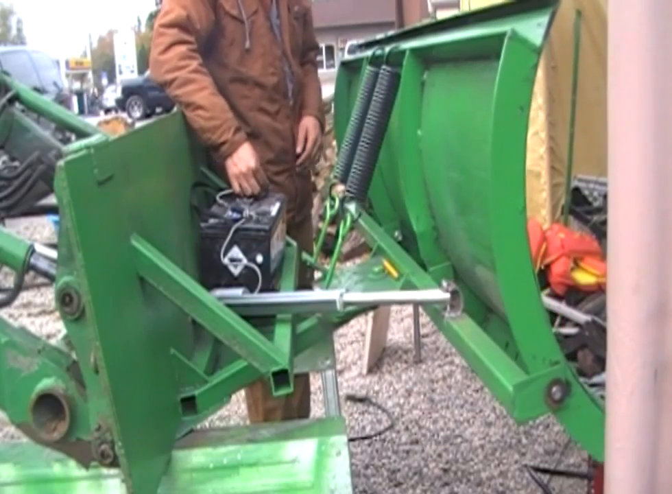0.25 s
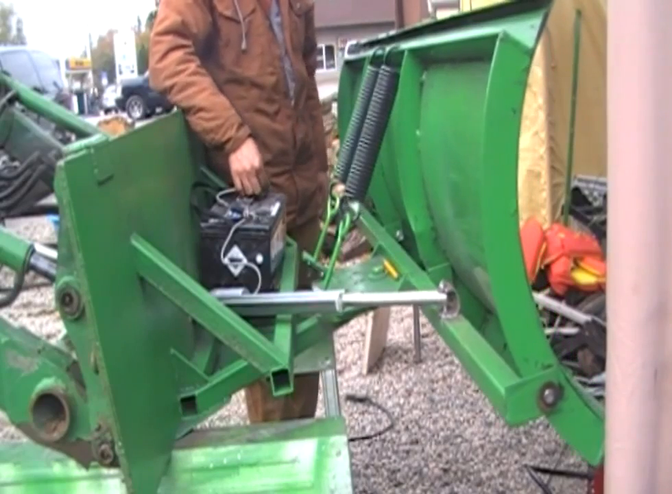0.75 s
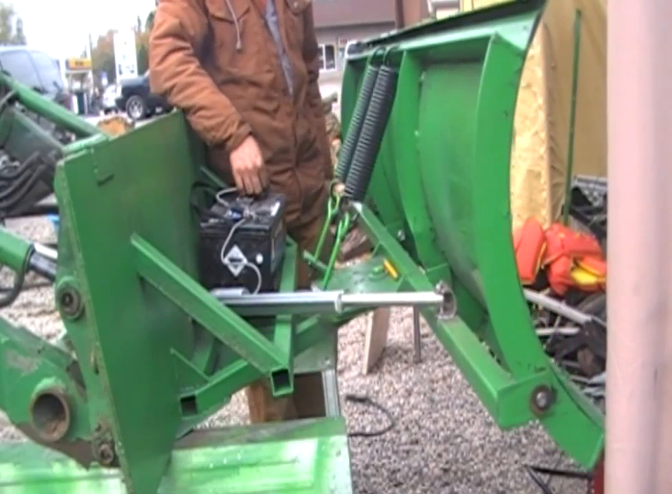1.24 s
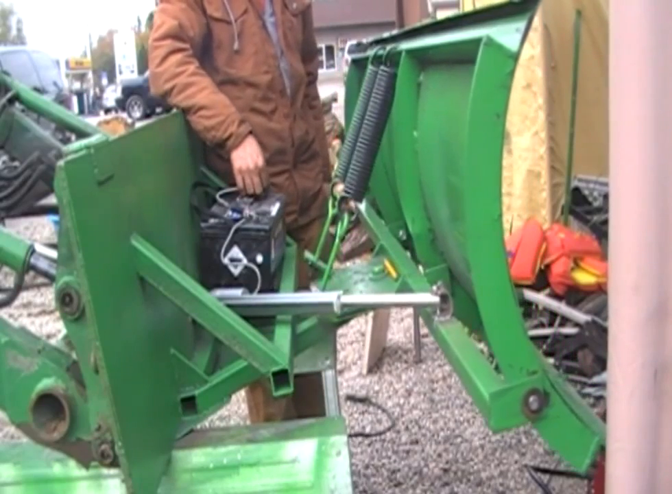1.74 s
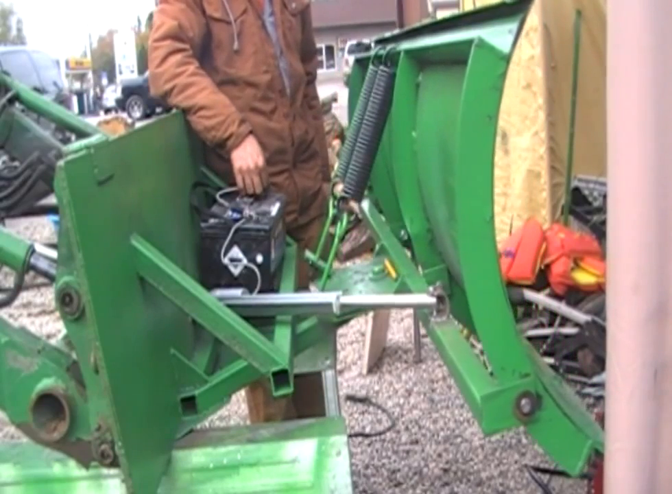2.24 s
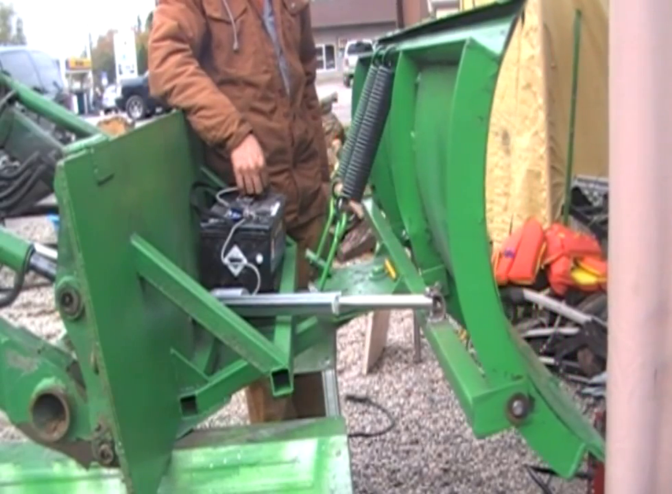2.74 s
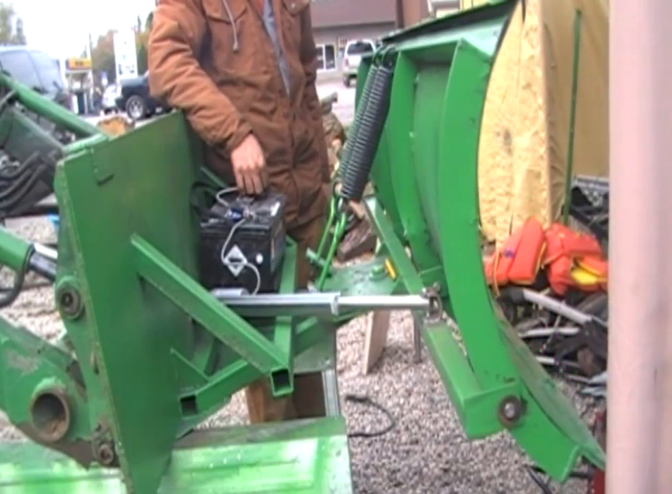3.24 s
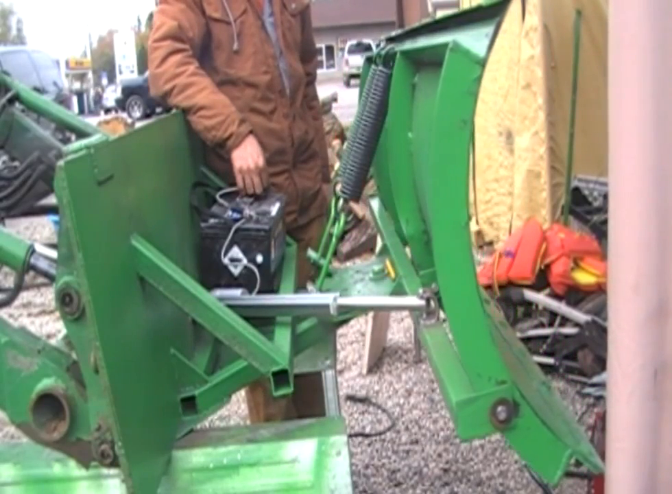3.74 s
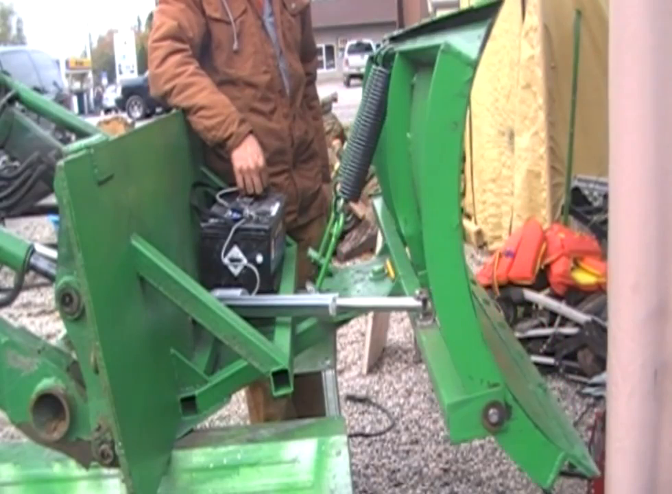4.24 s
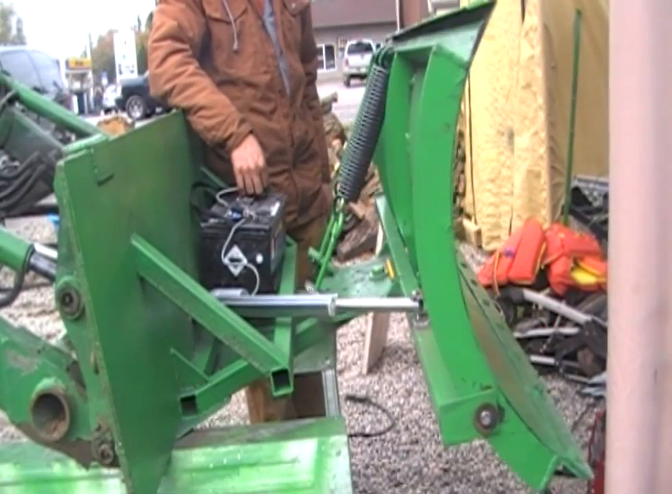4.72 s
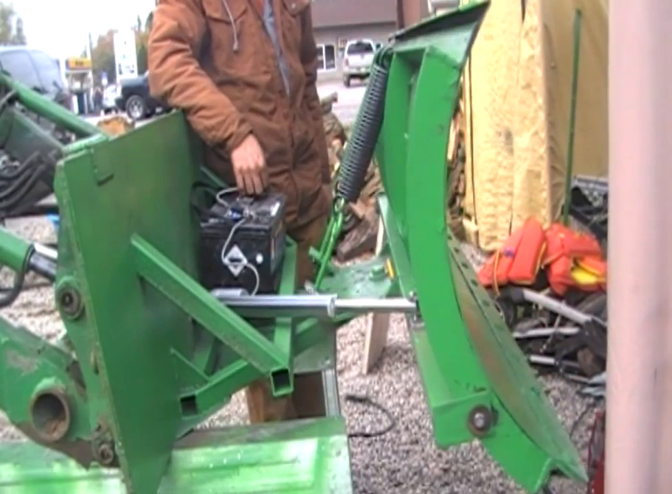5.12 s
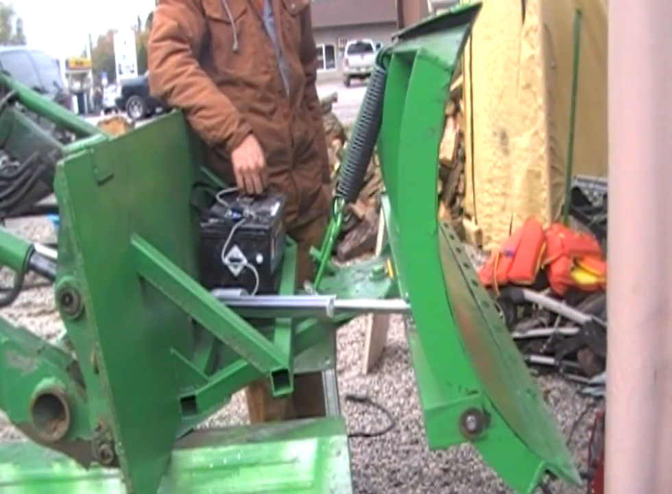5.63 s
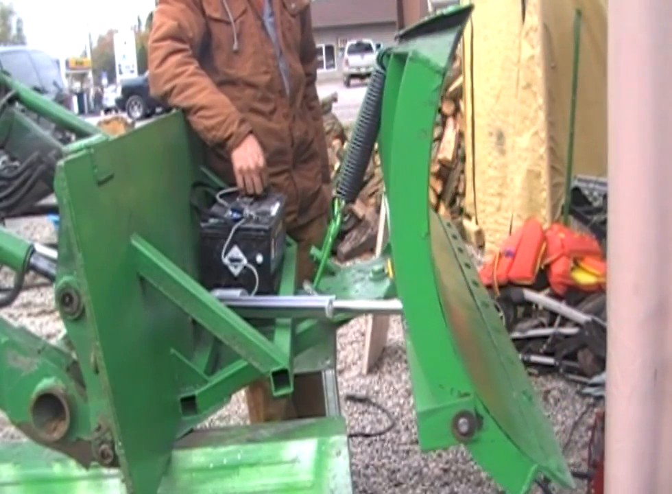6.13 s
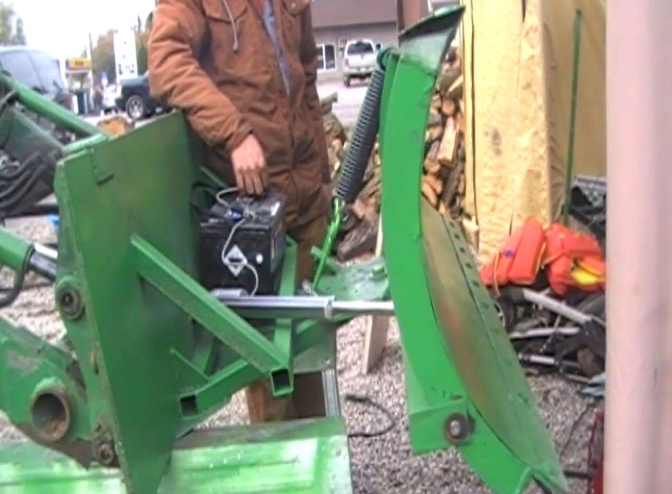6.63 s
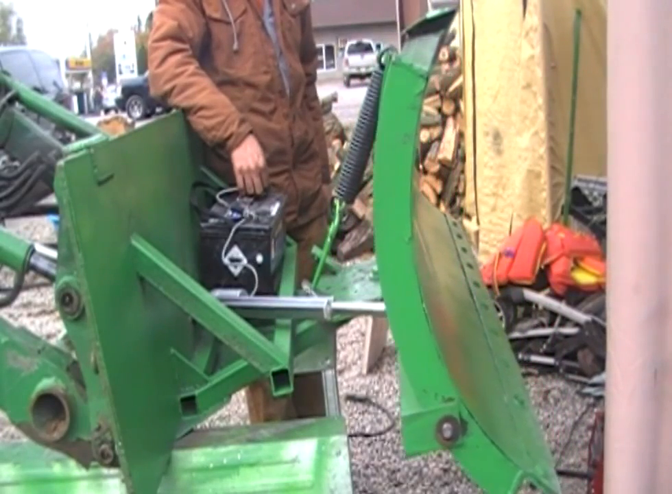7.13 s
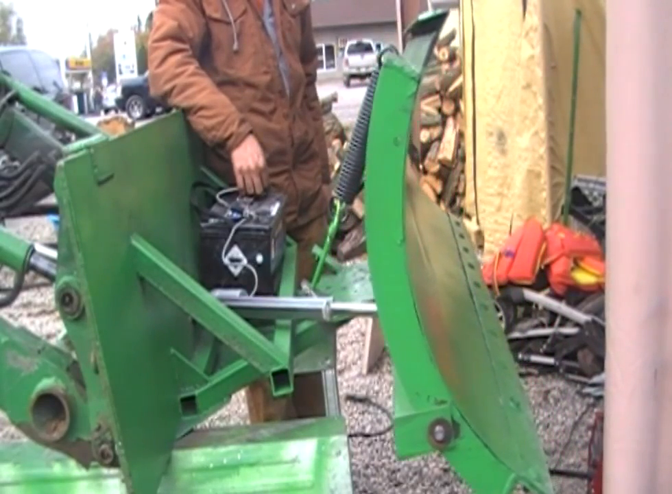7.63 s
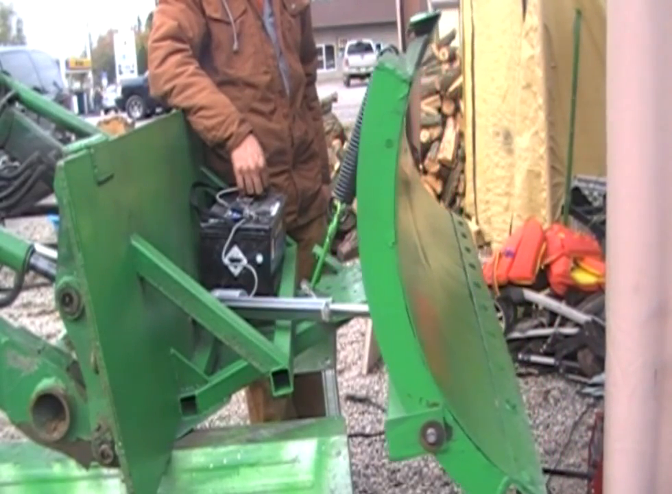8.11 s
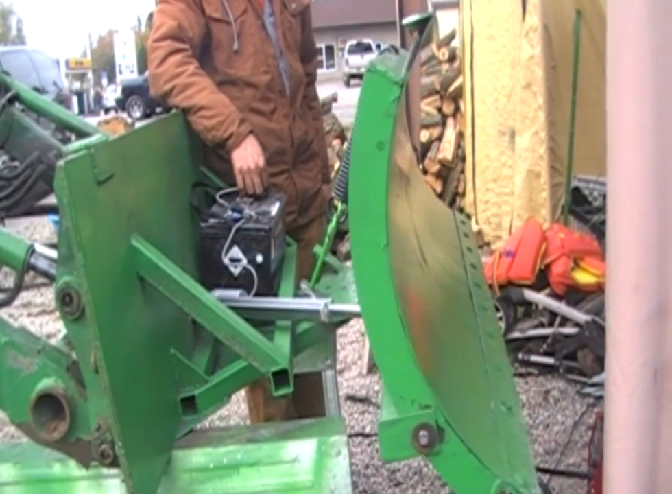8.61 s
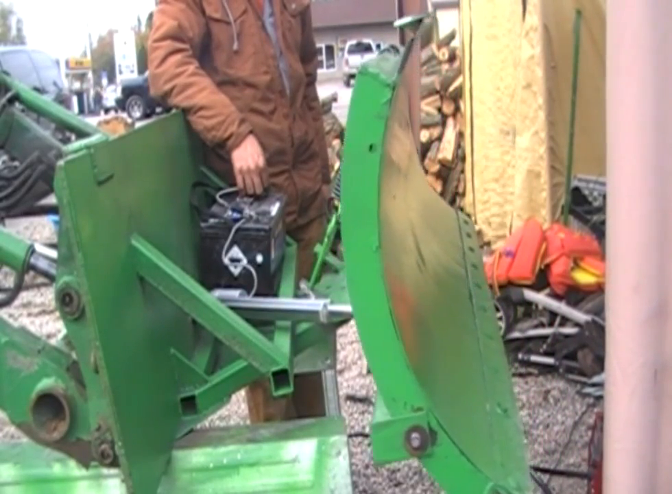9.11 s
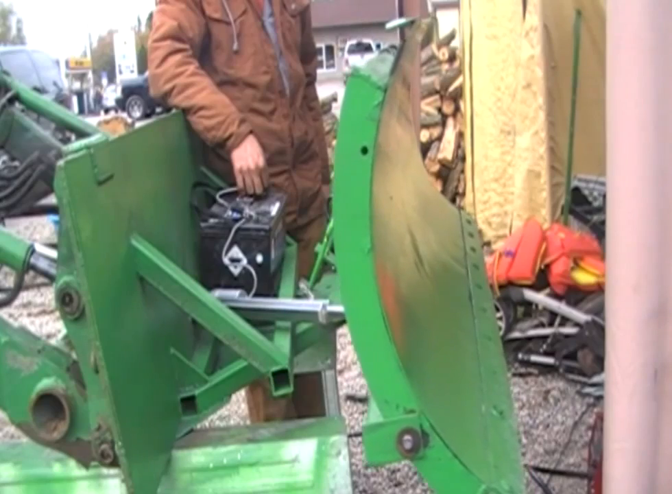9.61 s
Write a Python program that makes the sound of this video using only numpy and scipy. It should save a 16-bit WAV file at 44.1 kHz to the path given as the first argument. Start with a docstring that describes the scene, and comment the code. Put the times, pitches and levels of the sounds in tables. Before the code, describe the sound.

An electric linear actuator runs without a break, slowly swinging a steel plow blade in a yard. Its motor and gears make a steady, high, metallic whine of several tones, with a slight regular waver in pitch. A gritty, fast-pulsing grind runs along with it, and the sound grows a little brighter toward the end. The motor is heard up close, over a very faint rumble of distant traffic.

```python
"""In a yard, an electric linear actuator swings a steel plow blade. The 26-tooth pinion on its motor shaft
is a periodic source: the mesh whines, and harmonics of the shaft speed (orders) ring the housing, their
pitch rippling with each turn of the lead screw. A second gear stage adds weak tones between them, and
tooth flanks and brushes grind by sliding friction. Far below, traffic murmurs and an engine hums twice."""
import sys
import numpy as np
from scipy.fft import rfft, irfft, next_fast_len
from scipy.io import wavfile
from scipy.ndimage import uniform_filter1d, map_coordinates

SR = 44100
rng = np.random.default_rng(int(sys.argv[2]) if len(sys.argv) > 2 else 0)


def waveform_to_disk(signal):
    """Save audio, clipped to [-1, 1], as 16-bit WAV at the path in sys.argv[1]."""
    frames = np.transpose(np.atleast_2d(signal))
    scaled = np.clip(frames, -1, 1) * 32767
    samples = np.round(scaled).astype(np.int16)
    wavfile.write(sys.argv[1], SR, samples)


N = 434826
TIME = np.arange(N) / SR
TEETH, SAMPLES_PER_TURN = 26, 4096
FRAME_S = .025  # the orders take new strengths this often
FRAME_TIMES = np.arange(0, N / SR + 2 * FRAME_S, FRAME_S)

# motor under its changing load: t/s, mean rotation rate/Hz, ripple depth/Hz
MOTOR_SPEED = [(0.0, 34.346, 0.049), (0.55, 34.567, 0.136), (1.11, 34.524, 0.103), (1.28, 34.71, 0.139),
               (2.01, 34.89, 0.085), (2.28, 34.778, 0.122), (3.08, 34.503, 0.048), (3.5, 34.724, 0.025),
               (3.71, 34.606, 0.047), (4.05, 34.695, 0.113), (4.72, 34.447, 0.09), (4.87, 34.368, 0.115),
               (5.42, 34.3, 0.054), (5.94, 34.397, 0.095), (6.62, 34.199, 0.096), (6.86, 34.164, 0.119),
               (7.2, 34.248, 0.108), (7.58, 34.435, 0.084), (8.0, 34.262, 0.124), (8.26, 34.312, 0.033),
               (8.49, 33.948, 0.055), (9.08, 34.116, 0.19), (9.43, 34.1, 0.137), (9.86, 33.835, 0.009)]
# blade swing, over which the sound passes from early to late values: early t/s, late t/s
SWING_TIMES = [1.6, 8.2]
# strong orders, from the mesh (multiples of TEETH), uneven teeth and commutator bars: f/shaft rate
ORDERS = [17, 18, 25, 26, 34, 40, 42, 43, 48, 50, 51, 52, 53, 54, 56, 59, 60, 61, 66, 69, 70, 76, 77, 78,
          79, 81, 82, 85, 86, 87, 91, 92, 94, 95, 96, 97, 98, 99, 101, 102, 103, 104, 105, 106, 107, 108,
          111, 112, 114, 115, 117, 119, 120, 127, 128, 130, 131, 133, 137, 140, 153, 156, 157, 159, 182,
          192, 195, 198, 200, 202, 208, 234, 256, 257, 258, 260]
# base strength of each of these orders: early level/dB, late level/dB
ORDER_LEVELS = [(-67.5, -72.5), (-67.5, -77), (-69, -57), (-47.5, -45.0), (-51.5, -50.0), (-58, -58),
                (-67, -65.5), (-61.5, -61), (-57.5, -56.0), (-52, -58), (-48, -51.5), (-39.0, -40.5),
                (-54, -53.5), (-56, -60), (-53, -49), (-55, -57), (-53, -45.5), (-55.5, -52), (-56, -57),
                (-58, -57), (-60, -49.5), (-55, -50.5), (-55, -48.5), (-43, -36.5), (-63, -50), (-65, -57),
                (-55, -49), (-38.5, -41.5), (-46.0, -42), (-45, -43.0), (-41.5, -39), (-47.5, -43.0),
                (-44.5, -42), (-46.5, -42), (-62, -59), (-59, -60), (-45.0, -39), (-39.0, -45),
                (-46, -34.0), (-32, -28.5), (-38.5, -33), (-27.0, -24.0), (-35.5, -32.5), (-39.5, -45),
                (-40.5, -37), (-48, -53), (-48, -45), (-51, -45), (-53, -47), (-52.0, -44), (-51, -45),
                (-51.5, -46.5), (-49, -50), (-57, -48), (-52, -47), (-43, -40.5), (-52.5, -51), (-66, -57),
                (-57.5, -58), (-64.0, -57), (-55, -51), (-50, -49.5), (-56.5, -66), (-66, -59), (-52, -57),
                (-53.5, -55), (-58, -48), (-66, -53.0), (-60, -56.0), (-58, -60), (-64, -50), (-56.5, -52),
                (-57, -44.5), (-51, -53), (-44, -54), (-50.5, -50.5)]
# narrow peaks and notches of the metal: f/Hz, width/Hz, gain/dB
NARROW_PEAKS = [(888.0, 2.6, -3), (913.4, 12.9, 6.5), (1762.2, 3.9, 3.5), (1782.0, 8.5, -12),
                (1827, 11.8, -5.5), (2057, 10.4, -11), (2387, 10.1, -11.0), (2624.5, 26.9, 9.5),
                (2671, 4.8, -3.5), (2702, 8.0, -8.0), (2780, 14.3, 6.5), (2875, 6.4, -8.0),
                (2948, 16, -5.5), (3030, 21.3, -15.0), (3090, 19.5, -12), (3140, 7.4, -2.5),
                (3216, 15, 4.5), (3268, 21, 6.5), (3380, 17.5, -6), (3446, 19, -15), (3539, 39.3, -13.0),
                (3586, 12.7, 5.0), (3720, 43.5, -5), (3845, 16, 6.5), (3956, 11.5, 3.0), (4028, 24, -15),
                (4090, 14, -8.5), (4427, 16, -5.0), (4514, 20.4, 5.0), (5310, 25, -6.5), (5404, 17, -8.5),
                (5448, 28, 7.5), (6250, 24.8, -7), (6321, 10.4, 5.5), (6670, 18.3, -8), (8690, 39, -7.5)]
# slow drift of the lowest mesh tone: t/s, gain/dB
MESH_DRIFT = [(0, 1.5), (1.3, -1.5), (2.3, 1), (4, -1), (6.9, -2), (7.6, 0.5), (9.86, 1.5)]
# second gear stage and its sum and difference tones with the first: f/shaft rate
STAGE_TWO_ORDERS = [14.85, 15.1, 22.28, 24.15, 27.85, 30.22, 33.4, 44.57, 50.15, 53.85, 55.6, 56.22, 74.28,
                    76.15]
# strength of each of these tones: relative level/dB
STAGE_TWO_LEVELS = [-74.5, -72.5, -61, -58.5, -55, -57, -62, -61, -53, -65, -61, -53, -52, -51]
# load on the gears: t/s, grind gain/dB, extra treble gain/dB
GEAR_LOAD = [(0, -0.5, -3), (.4, -2, 0), (1, -1, 0.5), (2, -0.5, -0.5), (3, 0.5, 0), (4, 0.5, -1.5),
             (5, 0, -0.5), (6, 0.5, -1), (7, 0, -0.5), (8, 1, -2), (8.4, 1, -1.5), (9, -1, -0.5),
             (9.86, 1, -2)]
# broad radiation curve of housing, tube and blade: f/Hz, gain/dB
RADIATION = [(300, -66.5), (700, -48), (790, -34.5), (1400, -38), (2200, -32.5), (3000, -26.5),
             (4300, -27.5), (4800, -39), (6000, -37.5), (9000, -34), (10200, -40), (12000, -48.5),
             (14000, -56.5), (16000, -59)]
# housing resonances, and notches where panels cancel: f/Hz, width/Hz, early gain/dB, late gain/dB
HOUSING_MODES = [(755, 15, 0, 4.5), (1080, 300, 1.5, -2), (1580, 40, 4.5, 3), (1784, 27, 9, 10.5),
                 (1940, 30, 5, 7), (2220, 28, -6.5, -6.5), (2280, 42, 3, 8), (2476, 48, 5.5, 9),
                 (2638, 62, 7.5, 15.5), (2770, 69, -3, -5), (2930, 60, 1, -7), (3150, 39, -15, -12),
                 (3260, 115, 9, 9), (3660, 98, 8, 15), (3834, 48, 7, 8), (4090, 50, -1, 4.5),
                 (4494, 37, 9, 9.5), (5360, 92, 7.5, 6.5), (5830, 46, 2, -3), (5960, 54, -4, 5.5),
                 (6300, 60, 6, 9.5), (6540, 124, 6, 0.5), (6780, 100, -2, 11.5), (7060, 130, 10.5, 7),
                 (8740, 71, -1, 6), (8930, 85, 9.5, 9.5), (9610, 150, 5.5, 7.5), (10630, 84, 5.5, 9),
                 (11650, 110, 2, 6), (12800, 150, 3, 0)]
# loudness of the traffic: t/s, relative level/dB
TRAFFIC_LEVEL = [(0, -64.5), (1.1, -67.5), (1.4, -65), (2.5, -62), (4, -65.5), (4.8, -69), (5.2, -67.5),
                 (7.7, -70.5), (9.86, -69.5)]
# spectrum of the traffic: f/Hz, relative level/dB
TRAFFIC_SPECTRUM = [(15, -57), (25, -34), (78, -12.5), (130, -16), (194, -9.5), (430, -9.5), (515, -4.5),
                    (700, -1.5), (910, -23), (1540, -120)]
# hums of a far engine: start t/s, end t/s, start f/Hz, end f/Hz, relative level/dB
ENGINE_HUMS = [(2.25, 2.65, 186, 195, -68), (4.35, 5.03, 170, 182, -73)]


def amp(db):
    """Amplitude ratio of a level in decibels."""
    return 10 ** (np.asarray(db) / 20)


def bell(x, centre, width):
    """Gaussian curve of unit height."""
    return np.exp(-.5 * ((x - centre) / width) ** 2)


def spectrum_db(points, hz):
    """Interpolation of (f/Hz, level/dB) points on a logarithmic frequency axis."""
    f, db = np.transpose(points)
    return np.interp(np.log(hz + 1), np.log(f + 1), db)


def curves(rows):
    """Linear interpolation in time: a value per sample for each column after t/s."""
    times, *columns = np.transpose(rows)
    return [np.interp(TIME, times, column) for column in columns]


def filtered(x, response):
    """Linear filtering: the spectrum is multiplied by a frequency response."""
    size = next_fast_len(N + SR // 4)
    return irfft(rfft(x, size) * response(np.fft.rfftfreq(size, 1 / SR)), size)[..., :N]


def wobble(rate_hz):
    """Slow random modulation: a spline through Gaussian values drawn at rate_hz."""
    return map_coordinates(rng.standard_normal(int(N * rate_hz / SR) + 4), [TIME * rate_hz])


def drifting(count, share, frames):
    """Random amplitude and phase modulation (frame x order): a steady part plus a wandering share."""
    noise = rng.standard_normal((2, len(FRAME_TIMES), count))
    real, imag = uniform_filter1d(noise, frames, 1) * np.sqrt(frames / 2)
    return (1 + share * (real + 1j * imag)) / np.sqrt(1 + share ** 2)


def spin(spectra, turns):
    """Fourier synthesis: each frame's orders form the wave of one turn, read at the shaft angle."""
    waves = irfft(spectra, SAMPLES_PER_TURN) * SAMPLES_PER_TURN / np.sqrt(2)
    looped = np.c_[waves, waves[:, :1]]
    return map_coordinates(looped, [TIME / FRAME_S, turns % 1 * SAMPLES_PER_TURN], order=1)


def screw_ripple(screw_turns, catch=.27, lag_turns=.04):
    """The lead screw catches: a second harmonic flattens the ripple's crests and sharpens its troughs."""
    return np.cos(2 * np.pi * screw_turns) - catch * np.cos(4 * np.pi * (screw_turns - lag_turns))


def shaft(turns_per_screw_turn=11.418):
    """Frequency modulation: the screw ripples the shaft speed, whose integral is the shaft angle."""
    mean_hz, ripple_hz = curves(MOTOR_SPEED)
    screw_turns = np.cumsum(mean_hz) / SR / turns_per_screw_turn - .192
    shaft_hz = mean_hz + ripple_hz * screw_ripple(screw_turns)
    backlash = .0005 * wobble(rate_hz=14)  # play between the teeth shakes the angle
    turns = np.abs(np.cumsum(shaft_hz) / SR + backlash)
    return shaft_hz, turns, screw_turns


def gear_whine(shaft_hz, turns, screw_turns, swell_db=1, swell_lag_turns=.11, spread_turns=.652):
    """Forced vibration: each shaft order swells and fades as it slides across the metal's resonances."""
    hz = np.outer(np.interp(FRAME_TIMES, TIME, shaft_hz), ORDERS)
    level_db = np.transpose([np.interp(FRAME_TIMES, SWING_TIMES, db) for db in ORDER_LEVELS])
    level_db += sum(db * bell(hz, centre, width) for centre, width, db in NARROW_PEAKS)
    mesh = ORDERS.index(TEETH)  # the lowest mesh tone swells with each screw turn
    screw_angle = np.interp(FRAME_TIMES, TIME, screw_turns)
    level_db[:, mesh] += swell_db * screw_ripple(screw_angle - swell_lag_turns)
    level_db[:, mesh] += np.interp(FRAME_TIMES, *np.transpose(MESH_DRIFT))
    share = np.where(np.array(ORDERS) % TEETH == 0, .07, .2)  # mesh tones are the steadiest
    order = np.arange(SAMPLES_PER_TURN // 2 + 1)
    spectra = np.zeros((len(FRAME_TIMES), len(order)), complex)
    spectra[:, ORDERS] = amp(level_db) * drifting(len(ORDERS), share, frames=6)
    # neighbouring orders reach the air after different delays, so their beats spread over the turn
    phase = np.pi * order * (spread_turns * order + .16) + rng.normal(0, .35, len(order))
    return spin(spectra * np.exp(1j * phase), turns)


def second_stage(turns):
    """Meshing and intermodulation: weak tones between the shaft orders, each wavering on its own."""
    tones = np.zeros(N)
    for order, db in zip(STAGE_TWO_ORDERS, STAGE_TWO_LEVELS):
        gain = amp(db + 2.5 + 3.7 * wobble(rate_hz=4))
        tones += gain * np.sin(2 * np.pi * (order * turns + rng.random()))
    return tones


def scrape(turns, count=460, wear_db=-1.5, treble_wear_db=.93, fresh_db=-2):
    """Sliding friction of tooth flanks and brushes: the same marks pass every turn, over fresh noise."""
    order = np.arange(count)
    wear = amp(np.where(order > 6 * TEETH, treble_wear_db, wear_db))
    strength = wear * np.sqrt(rng.exponential(size=count) * 70 / SR)
    phasor = np.exp(2j * np.pi * rng.random(count))
    marks = np.zeros((len(FRAME_TIMES), SAMPLES_PER_TURN // 2 + 1), complex)
    marks[:, order] = strength * phasor * drifting(count, share=.55, frames=12)
    marks[:, ORDERS] = 0
    marks[:, TEETH - 1::TEETH] = marks[:, TEETH + 1::TEETH] = 0  # the mesh tones stand clear
    return spin(marks, turns) + amp(fresh_db) * rng.standard_normal(N)


def tight_spot_db(turns, swell_db=4.5, rise_turns=.11, fall_turns=.055):
    """Amplitude modulation: a tight spot on the pinion builds slowly and lets go fast, once a turn."""
    angle = (turns + .46) % 1 - .5
    swell = bell(angle, 0, np.where(angle < 0, rise_turns, fall_turns))
    bite_per_turn = rng.uniform(.58, .99, int(turns[-1]) + 2)
    return swell_db * bite_per_turn[(turns + .47).astype(int)] * swell


def gear_grind(turns, split_hz=5200, idler_ratio=.63):
    """Modulated friction noise: its level follows the load, and uneven gears pulse its treble."""
    friction = scrape(turns)
    low = filtered(friction, lambda hz: 1 / (1 + (hz / split_hz) ** 6))
    tick_db = 3 * bell(turns % 1, centre=.83, width=.013)  # one tooth ticks
    runout_db = .95 * np.cos(2 * np.pi * (idler_ratio * turns - .2))  # a slower wheel runs out of true
    load_db, treble_db = curves(GEAR_LOAD)
    treble_gain = amp(treble_db - 2 + tight_spot_db(turns) + tick_db + runout_db)
    return amp(load_db) * (low + treble_gain * (friction - low))


def housing(force, mode_spacing_hz=110.25):
    """Resonance: the metal colours what shakes it, and its modes change as the blade swings away."""
    panel_modes = rng.standard_normal((2, 200))  # crowds of small modes in the treble

    def response(hz, pose):
        modes_db = sum(db[pose] * bell(hz, centre, width) for centre, width, *db in HOUSING_MODES)
        panels_db = 1.6 * (hz > 7300) * map_coordinates(panel_modes[pose], [hz / mode_spacing_hz])
        return amp(spectrum_db(RADIATION, hz) + modes_db + panels_db)
    early = filtered(force, lambda hz: response(hz, pose=0))
    late = filtered(force, lambda hz: response(hz, pose=1))
    swung = np.interp(TIME, SWING_TIMES, [0, 1])
    return (1 - swung) * early + swung * late


def traffic():
    """Low-frequency random noise: far traffic rumbles at an uneven level."""
    rumble = filtered(rng.standard_normal(N), lambda hz: amp(spectrum_db(TRAFFIC_SPECTRUM, hz)))
    level_db = curves(TRAFFIC_LEVEL)[0] + 6 + 2.7 * wobble(rate_hz=6)
    return amp(level_db) * rumble / rumble.std()


def far_engine(fade_s=.04):
    """A gliding pure tone: a far engine hums faintly twice, rising in pitch each time."""
    hum = np.zeros(N)
    for start, end, start_hz, end_hz, db in ENGINE_HUMS:
        fade = np.clip(np.minimum(TIME - start, end - TIME) / fade_s, 0, 1)
        hz = np.interp(TIME, [start, end], [start_hz, end_hz])
        gain = amp(db + 4 + 1.5 * wobble(rate_hz=9))
        hum += gain * fade * np.sin(2 * np.pi * np.cumsum(hz) / SR)
    return hum


def scene():
    """Superposition: the sounds of the actuator and the street add in one channel."""
    shaft_hz, turns, screw_turns = shaft()
    actuator = gear_whine(shaft_hz, turns, screw_turns) + second_stage(turns) + housing(gear_grind(turns))
    return (actuator + traffic() + far_engine())[None]


def record(dry, cutoff_hz=15740):
    """Band limiting: an ideal low-pass filter passes nothing above its cutoff."""
    return filtered(dry, lambda hz: hz < cutoff_hz)


dry = scene()
out = record(dry)
waveform_to_disk(out)
```